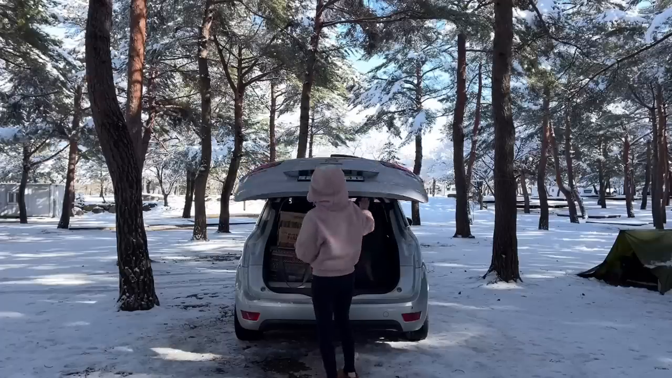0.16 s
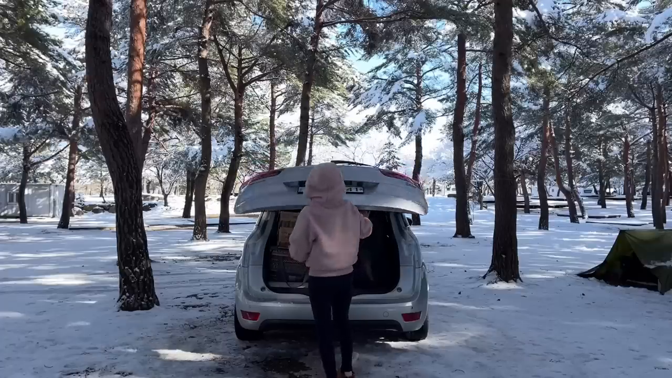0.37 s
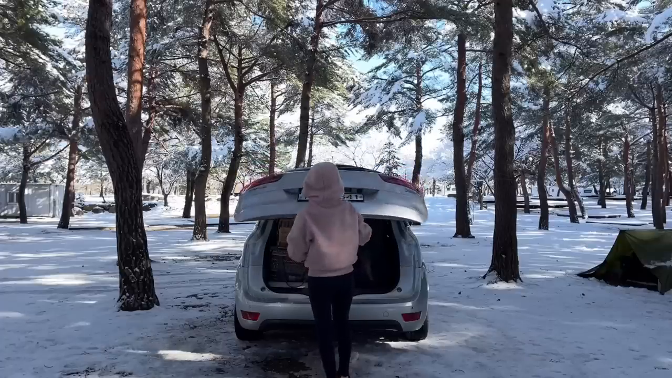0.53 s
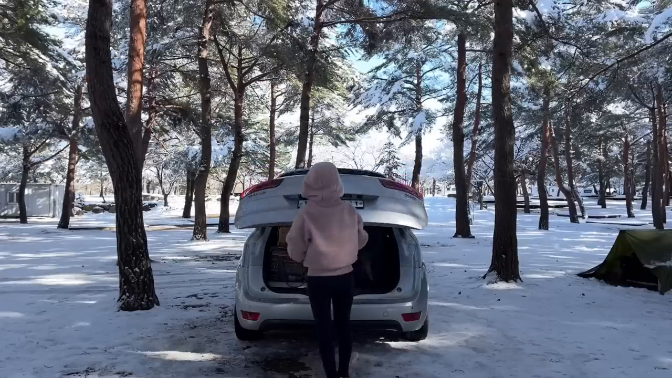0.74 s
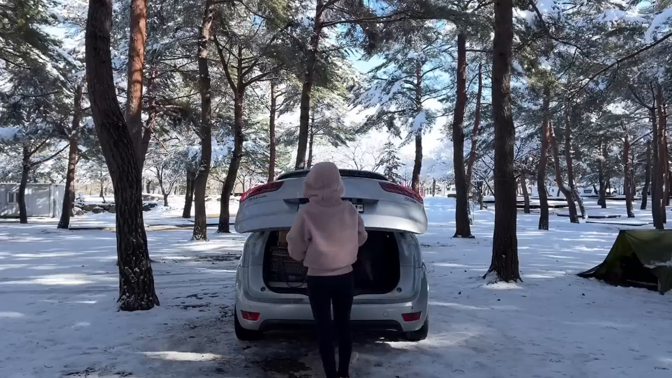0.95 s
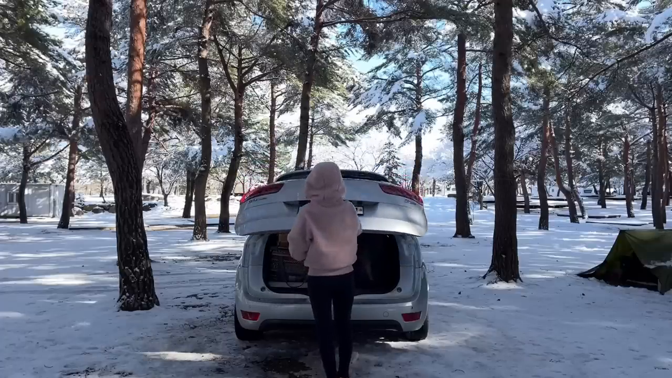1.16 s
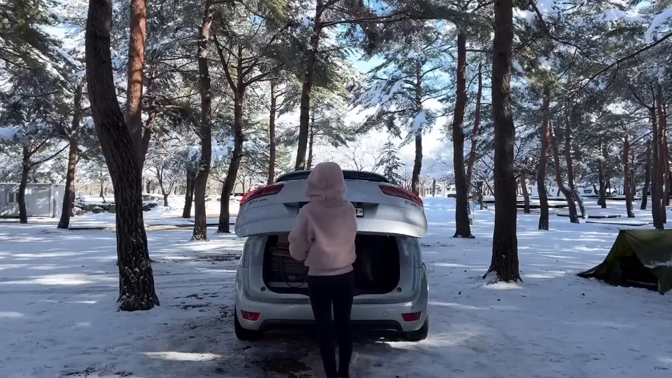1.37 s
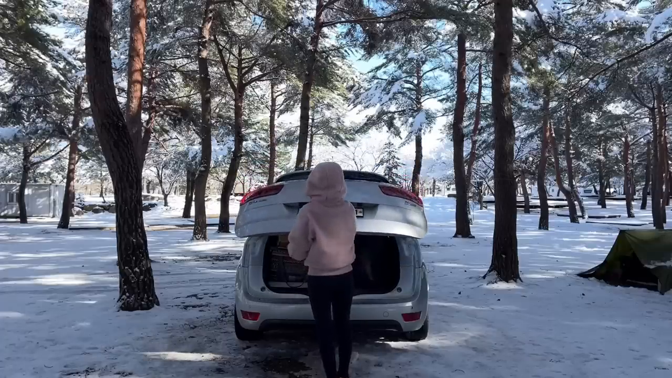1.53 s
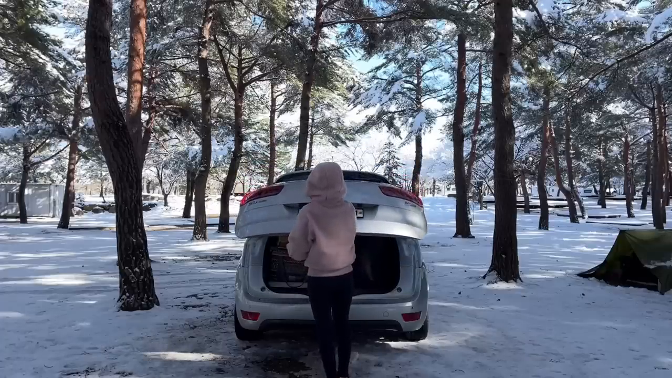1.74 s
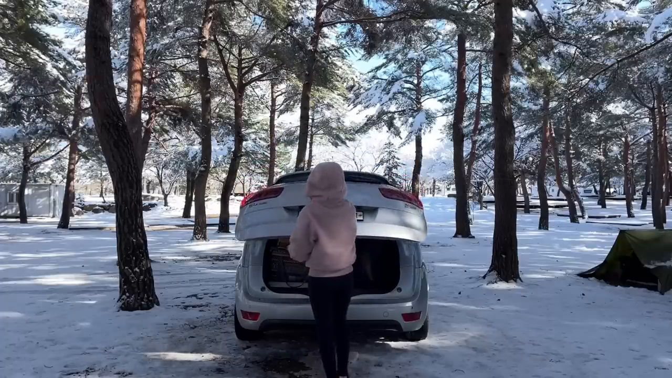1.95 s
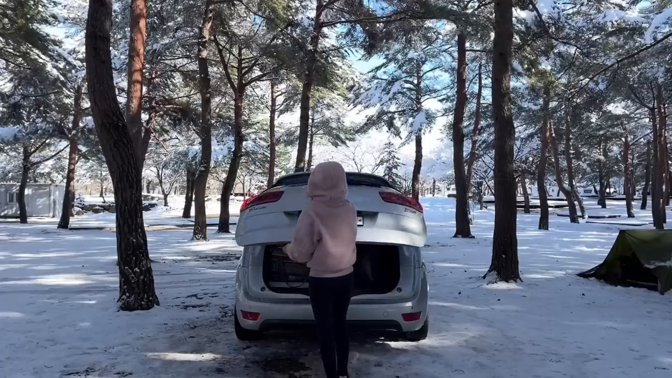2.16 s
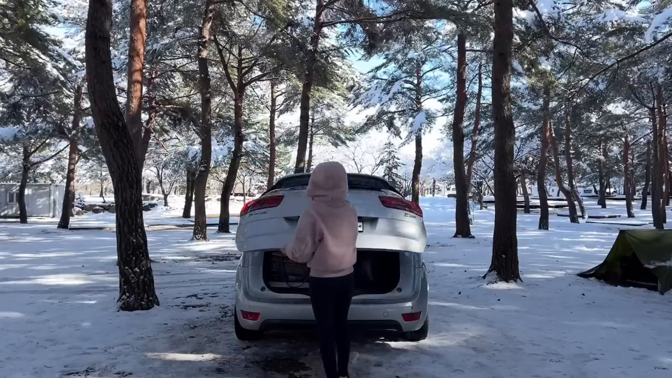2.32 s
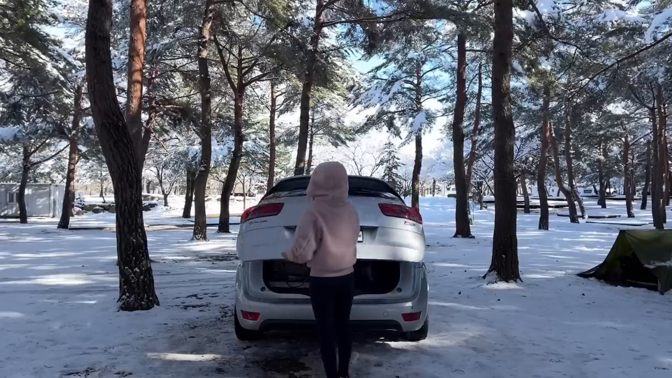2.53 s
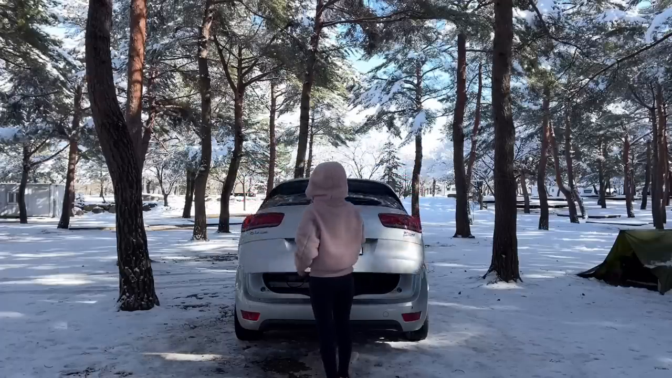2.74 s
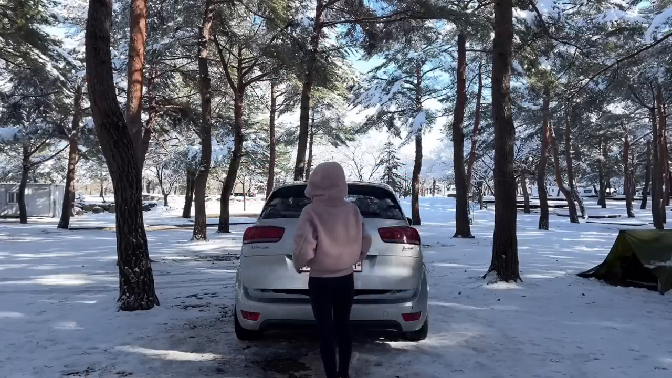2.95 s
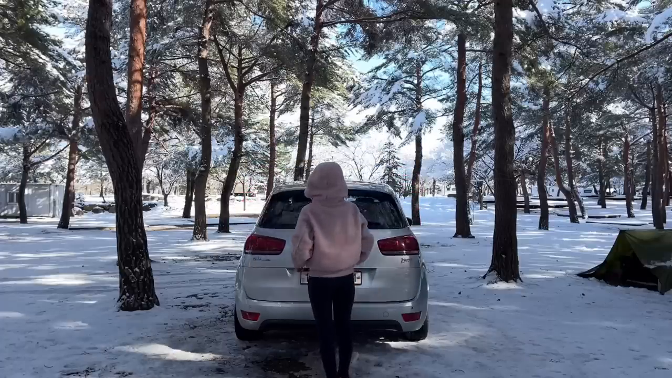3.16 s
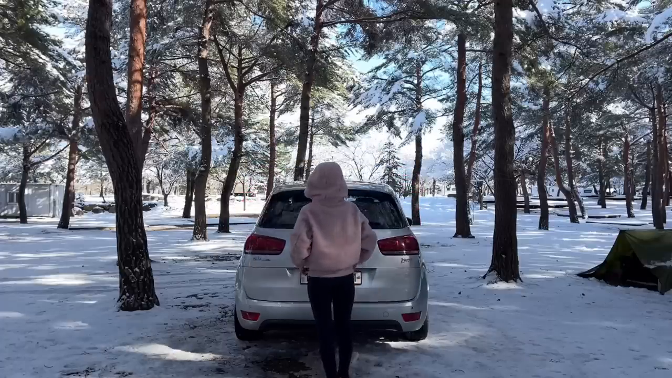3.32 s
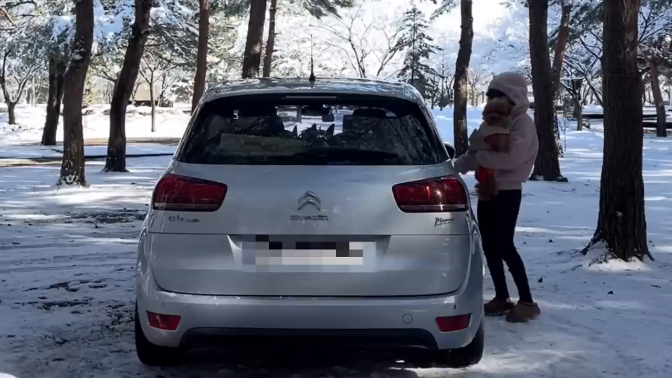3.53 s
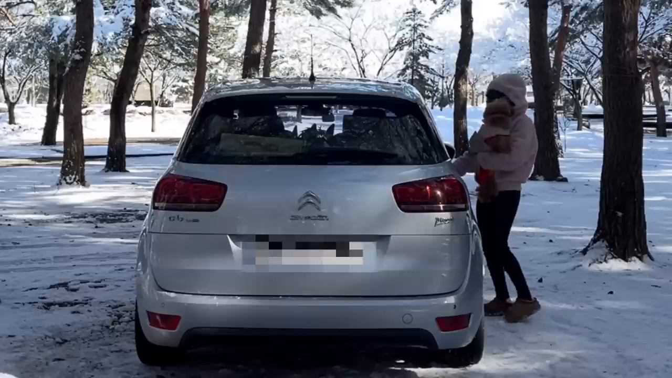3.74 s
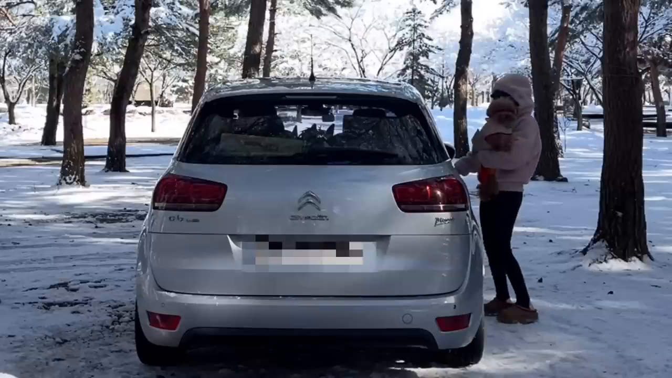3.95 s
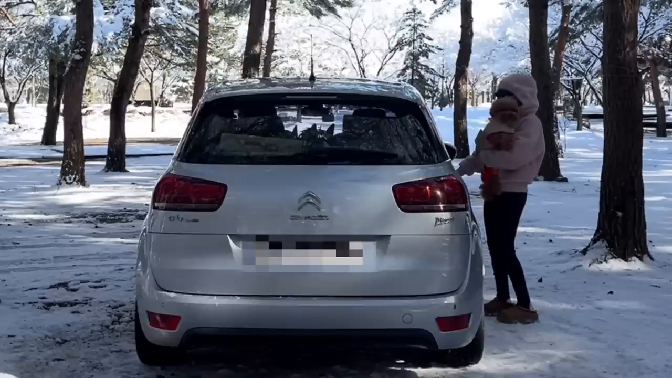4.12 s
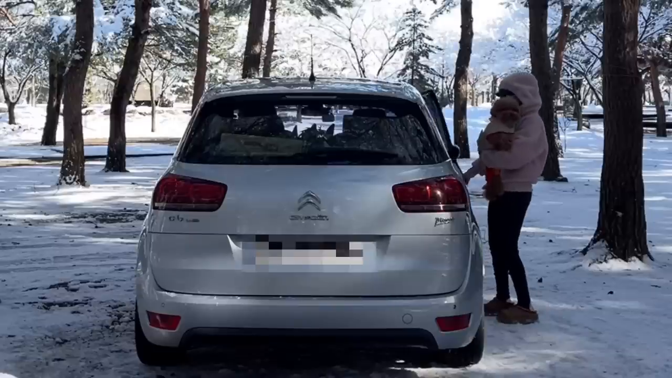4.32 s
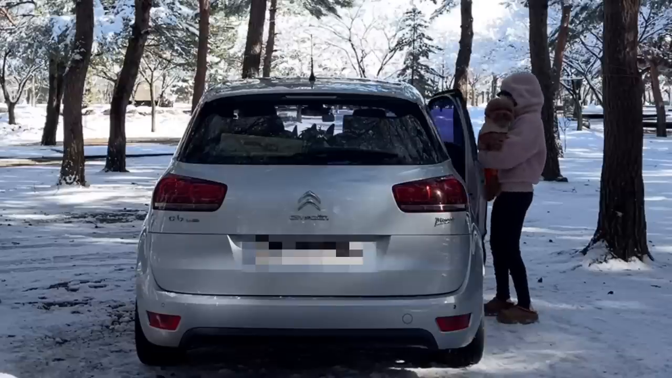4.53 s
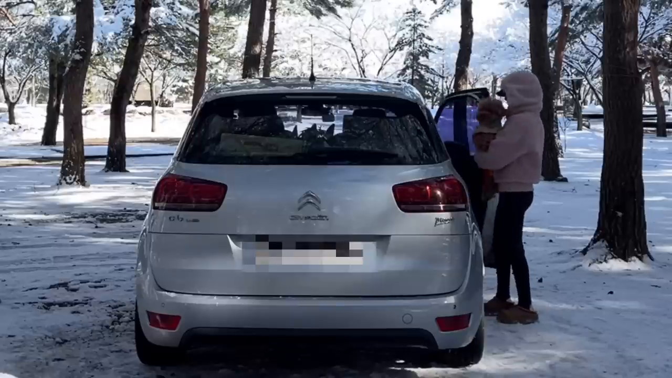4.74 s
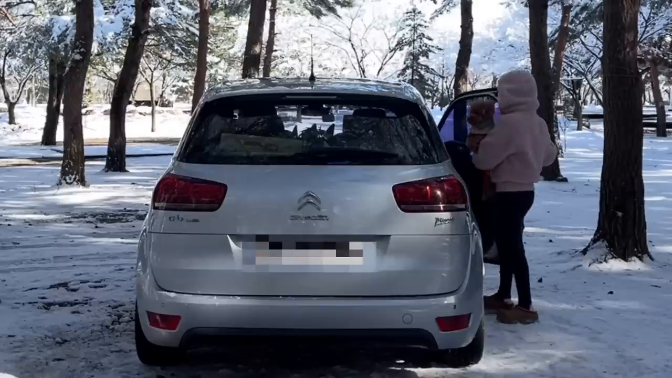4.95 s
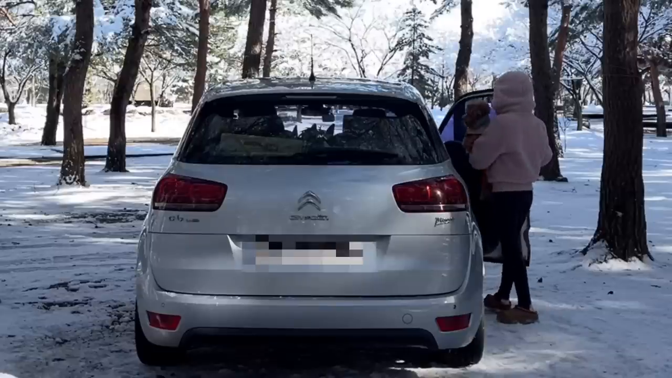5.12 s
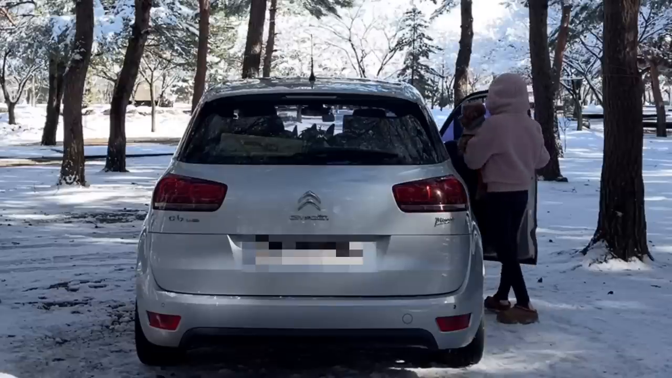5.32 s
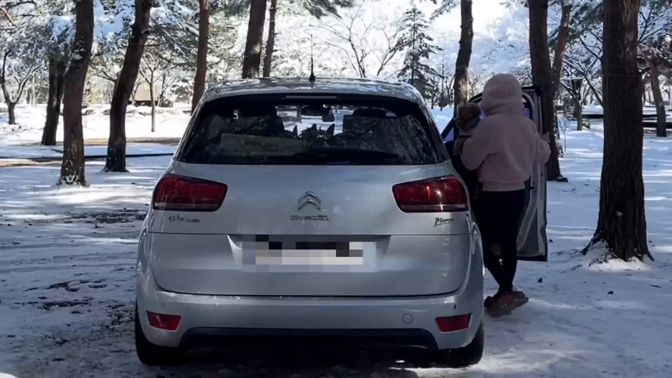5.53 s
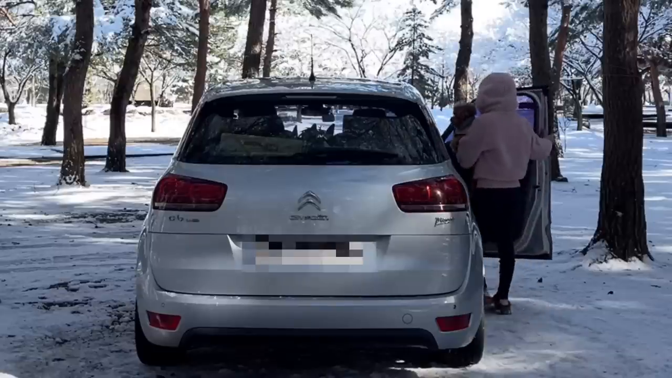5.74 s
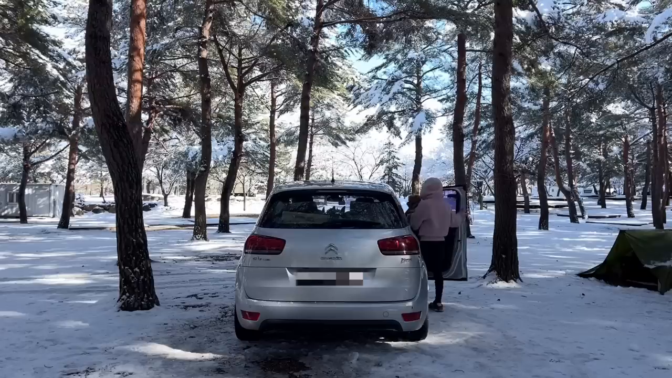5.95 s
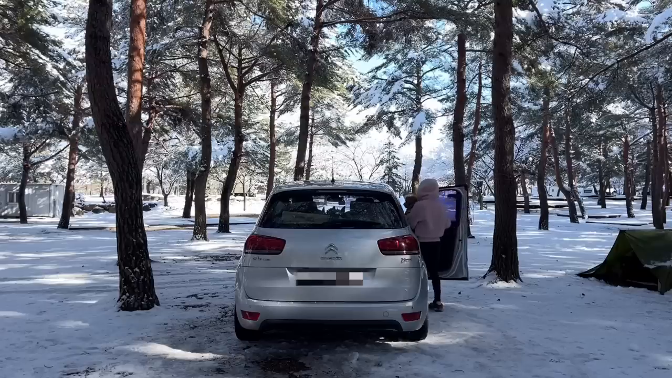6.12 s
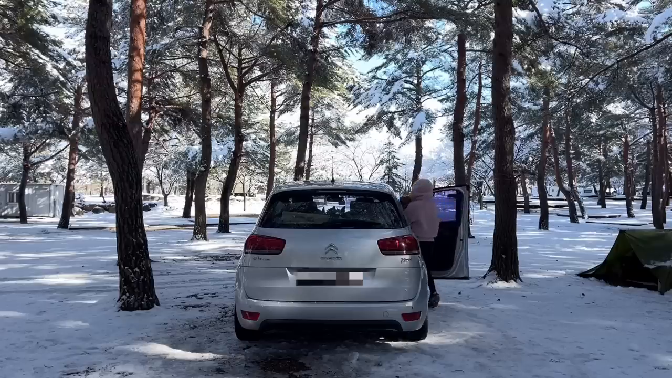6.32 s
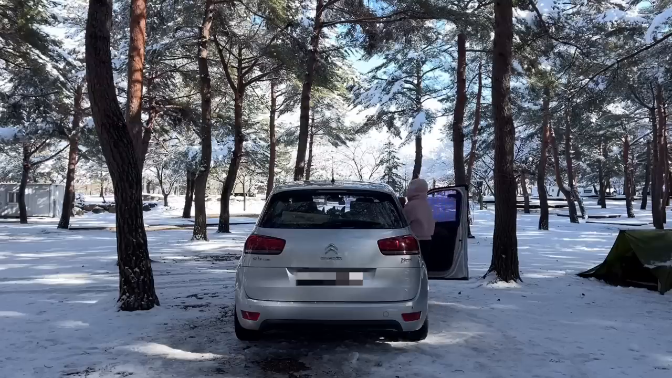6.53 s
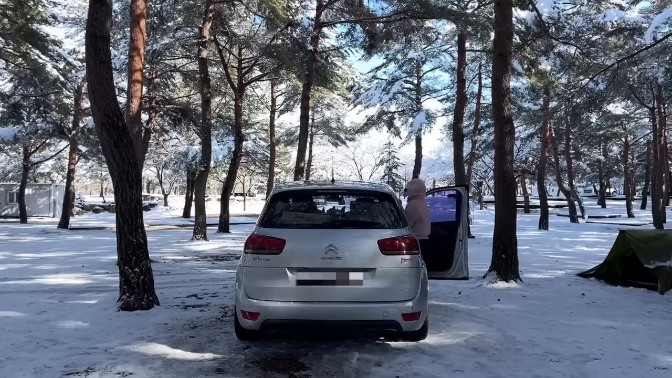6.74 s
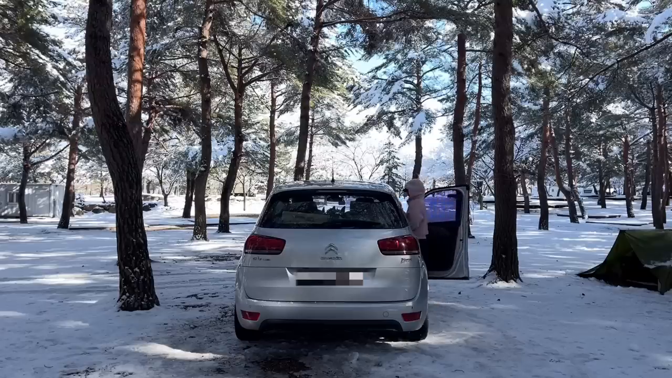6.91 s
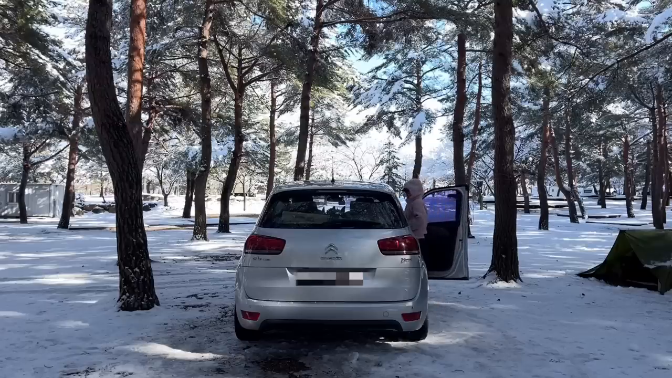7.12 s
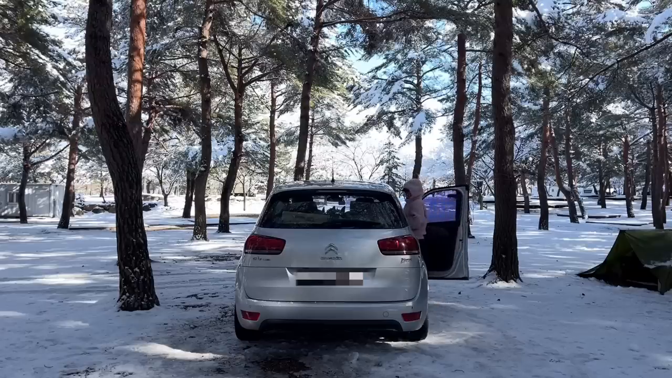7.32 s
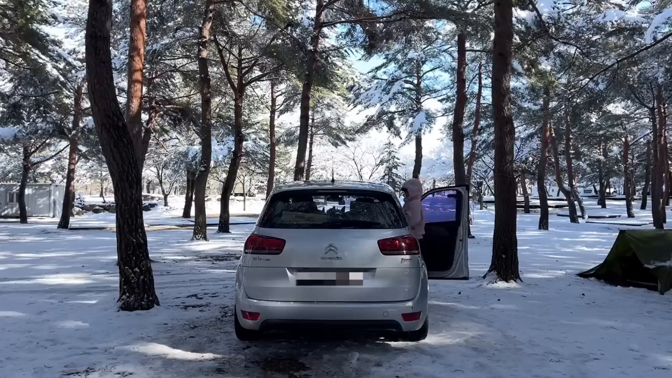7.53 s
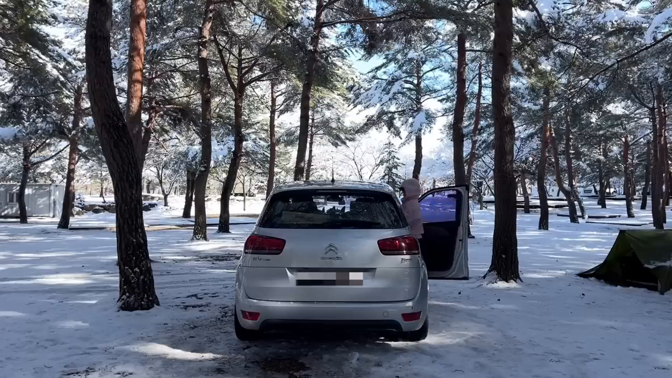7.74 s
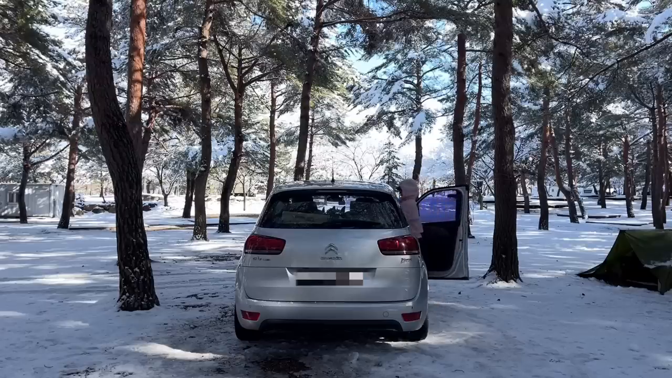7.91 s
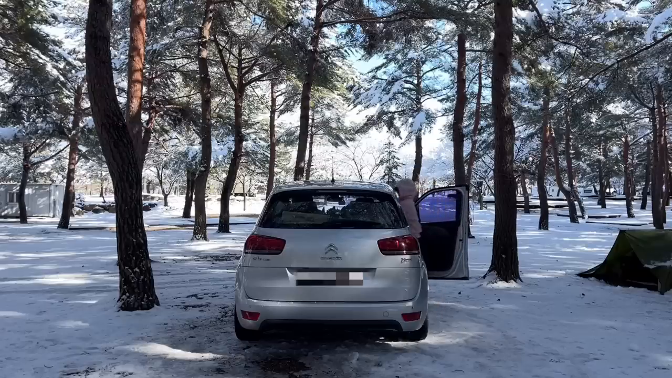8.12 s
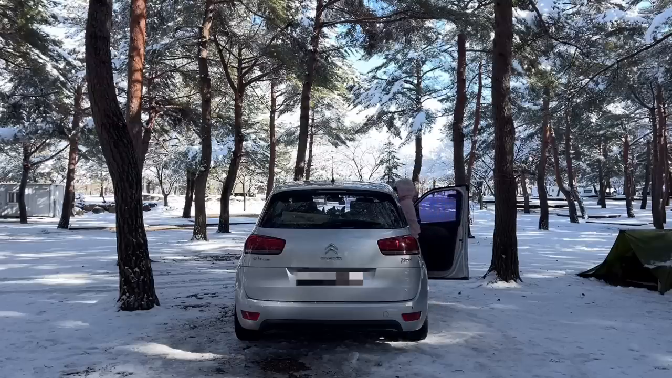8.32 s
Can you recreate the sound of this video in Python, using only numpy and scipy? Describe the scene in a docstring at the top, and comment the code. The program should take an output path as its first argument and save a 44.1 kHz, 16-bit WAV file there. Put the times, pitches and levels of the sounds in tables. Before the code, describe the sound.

Outdoor stereo microphone in an open snowy wood, facing an idling car. Crunching steps and a short scrape come first, with bright drips and very faint birds. Wind swirls rumble, then a violent tailgate slam clips the microphone, its deep cabin boom and steel latch followed by a gritty rattle and faint scattered echo from the trunks. After a sharp click, a side door pops open more softly; snow scuffs, drips, a sill knock, a latch tick and a bird call follow.

```python
"""A car idles throughout in a snowy pine wood: firing harmonics and throbbing noise, a few metres off.
Snow crunches as random cracks and meltwater drips in short noise bursts; a strut scrapes, birds call now and then.
Gusts buffet the microphone as brief swirls of low tone; then the tailgate slams, its panel modes, latch
and cabin boom overloading the microphone, and loose trim rattles. After a dry click a side door is
unlatched and swung open; a shoe knocks on its hollow sill, and latch contacts and a bird call come last."""
import sys
import numpy as np
from scipy import signal
from scipy.fft import rfft, irfft, next_fast_len
from scipy.io import wavfile

SR = 44100
rng = np.random.default_rng(int(sys.argv[2]) if len(sys.argv) > 2 else 0)


def wav_out(sig):
    """Save sig, one row per channel (or a flat mono array), as 16-bit PCM at SR to the path in sys.argv[1]."""
    wavfile.write(sys.argv[1], SR, np.round(np.clip(np.atleast_2d(sig).T, -1, 1) * 32767).astype(np.int16))


N = 369116
T = np.arange(N) / SR
FIRING_HZ = 27.33
EDDY_CYCLES = 4.17  # the same for every eddy, so the deep ones are the long ones


def amp(db):
    """Level law: decibels to amplitude ratio."""
    return 10 ** (np.asarray(db) / 20)


def unit(x):
    """Normalisation to an rms amplitude of 1."""
    return x / np.sqrt(np.mean(x ** 2) + 1e-20)


def read(points, hz):
    """Interpolation of a table on a logarithmic frequency axis."""
    f, value = np.transpose(points)
    return np.interp(np.log(hz + 1), np.log(f + 1), value)


def add(mix, s, sound):
    """Linear superposition of a sound that starts at time s."""
    part = mix[max(round(s * SR), 0):][:len(sound)]
    part += sound[:len(part)]


def bins(n):
    """Frequencies of the discrete spectrum of n samples, in Hz."""
    return np.fft.rfftfreq(n, 1 / SR)


def band(x, hz, q, order=1):
    """Resonance: the response of a damped oscillator (or several alike) to x; rms 1."""
    f = bins(len(x)) + 1e-3  # keeps clear of division by zero
    response = 1 / (1 + 1j * q * (f / hz - hz / f)) ** order
    return unit(irfft(rfft(x) * response, len(x)))


def drift(hz):
    """Slow random modulation: noise under a Gaussian low-pass of the given rate; rms 1."""
    n = next_fast_len(N)
    spectrum = rfft(rng.standard_normal(n)) * np.exp(-(bins(n) / hz) ** 2)
    return unit(irfft(spectrum, n)[:N])


def ring(modes, rise, t60):
    """Modal decay: modes swell as the blow lands, then die; t60/s holds at 1 kHz, less above."""
    t = T[:SR]
    sound = np.zeros(SR)
    for hz, db in modes:
        decay = amp(db - 60 * t / t60 * (hz / 1000) ** .2)
        sound += decay * np.sin(2 * np.pi * (hz * t + rng.random()))
    return sound * (1 - np.exp(-t / rise))


def cracks(per_s, grain_db):
    """Random impulse process: one second of tiny contacts at random times and of random size."""
    size = amp(grain_db * np.minimum(rng.exponential(1, SR), 3))
    happens = rng.random(SR) < per_s / SR
    return rng.standard_normal(SR) * happens * size


def wash(turns, level_db=-38.5, throb=0.21, swell_db=0.84):
    """Amplitude modulation: engine noise throbs with the firings and merges into the wood's hiss."""
    # engine wash and open air: f/Hz, relative level per Hz/dB
    noise_levels = [(25, -6), (45, -19), (70, 2), (110, -1.5), (170, -2.5), (260, -0.5), (420, -8.5),
                    (600, -7.5), (850, -18.5), (1250, -17.5), (1600, -24.5), (2900, -25), (4200, -31),
                    (12000, -41), (14000, -48)]
    # left-right likeness of the noise: f/Hz, correlation/1
    likeness = [(130, 0.9), (280, 0.96), (600, 0.71), (1300, 0.56), (6000, 0.59), (12000, 1)]
    # course of the treble hiss: t/s, relative level/dB
    hiss_levels = [(.5, -1.5), (2.2, -2.5), (3.5, 1.5), (5.05, -2.5), (6.4, 3.5), (7.3, -2), (8.2, -0.5)]
    f = bins(N)
    a, b = rfft(rng.standard_normal((2, N)))
    same = np.clip(read(likeness, f), -1, 1)
    mid = a * np.sqrt((1 + same) / 2)
    side = b * np.sqrt((1 - same) / 2)
    # the noise is weakened below 20 Hz
    noise = np.array([mid + side, mid - side]) * amp(read(noise_levels, f) - 60 * (f < 20))
    engine_share = 1 / (1 + (f / 2500) ** 2)
    engine = irfft(noise * engine_share, N)
    hiss = irfft(noise * (1 - engine_share), N)
    throbbing = engine * (1 + throb * np.cos(2 * np.pi * turns))
    sound = throbbing + hiss * amp(np.interp(T, *np.transpose(hiss_levels)))
    return amp(level_db + swell_db * drift(23)) * unit(sound)


def exhaust(turns, level_db=-32.5, waver=0.19, rough=0.35, smear=.21):
    """Harmonic series on the firing rate: the second order is steadiest, the others waver more."""
    # exhaust note, half multiples from unequal cylinders: multiple of firing rate/1, relative level/dB
    exhaust_orders = [(1.5, -18.5), (2, 1), (2.5, -19.5), (3, -8), (4, -13.5), (5, -11.5), (6, -13.5),
                      (7, -20), (8.5, -18), (9, -18), (9.5, -23), (10, -20.5), (11.5, -22.5), (13, -21.5)]
    # hum of the belt drive: multiple of firing rate/1, relative level/dB
    belt_orders = [(19, -25.5), (22, -24.5), (23, -26.5)]
    out = np.zeros(N)
    for order, db in list(exhaust_orders) + list(belt_orders):
        depth = waver if round(2 * order) == 4 else rough
        lag = smear * order ** 2  # the silencer spreads each firing out in time
        tone = np.cos(2 * np.pi * (order * turns - lag))
        out += amp(db) * (1 + depth * drift(5.4)) * tone
    return amp(level_db) * np.sqrt(2) * out


def eddy(db, hz, wander=0.18, peak_cycles=0.98, quicken=0.78, slowest=0.672):
    """Turbulent pressure: an eddy pushes in a few uneven cycles, quickest at their sharp peak."""
    n = int(EDDY_CYCLES / hz * SR)
    push = np.exp(-abs(T[:n] * hz - EDDY_CYCLES / 2) / peak_cycles)
    slow_noise = rfft(rng.standard_normal(SR)) * np.exp(-(bins(SR) / 200) ** 2)
    unsteady = unit(irfft(slow_noise, SR))[:n]
    rate_hz = hz * (slowest + quicken * push ** 2) * np.exp(wander * unsteady)
    turns = np.cumsum(rate_hz) / SR + rng.random()
    return amp(db) * unit(np.sin(2 * np.pi * turns) * push * np.hanning(n) ** .5)


def gusts(scatter_db=3, count=24, gap_s=.05, middle_hz=85.6, octaves=0.83):
    """Wind noise by turbulence: strong eddies, and weaker ones of random size while a breeze lasts."""
    # strongest eddies on the microphone: t of the peak/s, level/dB, nominal f/Hz
    strong_eddies = [(2.198, -22.5, 98), (2.605, -20, 77.4), (2.68, -23, 100), (2.768, -13, 57.4),
                     (2.845, -19.5, 69), (2.893, -12, 73.2), (2.897, -21.5, 180), (3.056, -18, 63),
                     (3.45, -21, 52.3), (3.502, -18.5, 62), (4.015, -22.5, 135), (4.944, -21, 66)]
    # breezy spells full of weaker eddies: start t/s, end t/s, middle level/dB
    breezes = [(2.591, 3.4, -23.5), (4.992, 5.1, -27)]
    out, eddies = np.zeros(N), list(strong_eddies)
    for start, end, db in breezes:
        for k, (late, strength, size) in enumerate(rng.uniform(-1, 1, (count, 3))):
            s = start + (k + late / 2) * gap_s
            if s < end:
                eddies.append((s, db + scatter_db * strength, middle_hz * 2 ** (octaves * size)))
    for s, db, hz in eddies:
        add(out, s - EDDY_CYCLES / hz / 2, eddy(db, hz))
    return out


def drip(tick_db, splat_db):
    """Impact noise of a drop on the snow crust: a bright tick, a duller splat and a faint spatter."""
    t = T[:2048]
    shape = np.exp(-t / 0.00098) + 0.074 * np.exp(-t / 0.034)  # impact, then spatter
    tick, splat = rng.standard_normal((2, len(t)))
    bright = amp(tick_db) * band(tick, 9430, 1.63, order=2)
    dull = amp(splat_db) * band(splat, 4700, 0.99, order=2)
    return shape * (bright + dull)


def thaw(faint_db=-46, range_db=6, far_splat_db=-5, count=80):
    """Random superposition: near drips, and many more at random times among the trees."""
    # nearest drips: t/s, tick level/dB, splat level/dB
    near_drips = [(0.1614, -32.5, -42), (1.024, -37, -42), (1.234, -37, -45), (1.4838, -32.5, -36.5),
                  (2.814, -40, -45), (3.7937, -33, -40), (4.07, -38, -27.5), (5.4535, -33, -34.5),
                  (5.8636, -37, -37), (6.096, -31.5, -35), (6.2585, -28.5, -40), (6.373, -39, -38),
                  (6.571, -39, -24.5), (6.645, -36.5, -37), (6.726, -45, -34)]
    near, far = np.zeros(N), np.zeros((2, N))
    for s, tick_db, splat_db in near_drips:
        add(near, s, drip(tick_db, splat_db))
    for when, size, side in rng.random((count, 3)):
        db = faint_db + range_db * size ** 2
        add(far[int(side * 2)], when * N / SR, drip(db, db + far_splat_db))
    return near + far + .5 * far[::-1]  # each far drip is half as strong on the other side


def birds():
    """Band-limited noise under a smooth envelope: short calls from the treetops, thin or hoarse."""
    # bird calls: t/s, level/dB, f/Hz, length/s, Q/1
    calls = [(0.612, -61, 8560, 0.25, 9), (1.616, -59, 8800, 0.17, 5.1), (8.19, -45.5, 4630, 0.14, 3.5)]
    out = np.zeros(N)
    for s, db, hz, length, q in calls:
        n = int(length * SR)
        call = band(rng.standard_normal(SR), hz, q, order=2)[:n]
        add(out, s, amp(db) * call * np.hanning(n))
    return out


def scuffs(grain_db=2.0, clump_db=3.5, q=1.04, per_s=900, spacing=1.7):
    """Stick-slip: snow and cloth slip in clumps; three resonances swell, so the colour keeps shifting."""
    # shuffling feet and clothes: t of the peak/s, level/dB, f/Hz, length/s
    shuffles = [(0.043, -44, 1770, 0.1), (.18, -47.5, 1900, .32), (3.999, -48.5, 2200, 0.18),
                (5.279, -49.5, 2400, 0.22), (5.81, -49.5, 1800, .22), (6.155, -44.5, 2120, .16),
                (6.284, -41.5, 2200, 0.12), (6.639, -38, 1700, .075), (6.704, -43.5, 1450, 0.12),
                (7.245, -49.5, 1830, 0.21), (7.765, -47.5, 1710, 0.15)]
    out, clumps = np.zeros(N), np.tanh(drift(70))  # clumps swell all three resonances together
    swells = []
    for ratio in (1 / spacing, 1, spacing):
        swell = amp(clump_db * (clumps + np.tanh(drift(76))))
        swells.append((ratio, swell / max(ratio, 1)))
    for s, db, hz, length in shuffles:
        n, slips = int(length * SR), cracks(per_s, grain_db)
        crunch = 0
        for k, (ratio, swell) in enumerate(swells):
            resonance = band(slips, hz * ratio, q, order=2)[:n]
            crunch = crunch + (-1) ** k * resonance * swell[int(s * SR):][:n]
        add(out, s - length / 2, amp(db) * unit(crunch) * np.hanning(n))
    return out


def snaps(t60=0.054, q=0.93, per_s=6000, grain_db=1.0):
    """Brittle fracture: the snow crust breaks underfoot in one short, dying run of cracks."""
    # snaps of the crust: t/s, level/dB, f/Hz
    crust_breaks = [(.006, -36.5, 1860), (.0752, -37, 1600), (0.157, -42, 2600), (0.217, -41, 2400),
                    (0.281, -34.5, 2300), (4.194, -38.5, 2200), (5.258, -41, 2820), (5.69, -33.5, 2030),
                    (6.049, -40.5, 2340), (6.286, -39, 2500), (6.615, -36.5, 1900)]
    out = np.zeros(N)
    for s, db, hz in crust_breaks:
        decay = amp(db - 60 * T[:SR] / t60)
        add(out, s, decay * band(cracks(per_s, grain_db), hz, q, order=2))
    return out


def sill():
    """Modal excitation: a shoe knocks on the hollow door sill."""
    # knocks: t/s, level/dB
    knocks = [(6.628, -28), (6.646, -31)]
    # modes of the sill: f/Hz, relative level/dB
    sill_modes = [(587, 2), (1290, -9)]
    out = np.zeros(N)
    for s, db in knocks:
        add(out, s, amp(db) * ring(sill_modes, rise=.002, t60=.09))
    return out


def click(s=3.5184, level_db=-19):
    """Impulse: one dry, full-range click, a pressure step that dies exponentially."""
    out = np.zeros(N)
    add(out, s, amp(level_db) * np.exp(-T[:SR] / 0.00056))
    return out


def strut(per_s=3500, grain_db=2, sag_per_s=1.3):
    """Stick-slip: the tailgate's strut scrapes as it is pulled down, its resonances sinking in pitch."""
    # course of the pull: t/s, level/dB
    pull = [(.465, -64), (.475, -44), (.495, -52), (.514, -38.5), (.528, -48), (.54, -45), (.56, -49.5),
            (.64, -53)]
    # resonances, which sink as the strut slows: f/Hz, width/Hz, relative level/dB
    resonances = [(950, 230, 5), (1950, 130, -1), (2700, 1300, -1), (4250, 790, -1), (5330, 1200, -9)]
    out, (when, db) = np.zeros(N), np.transpose(pull)
    t = T[:int((when[-1] - when[0]) * SR)]
    slowed = t - sag_per_s * t * (t - t[-1] / 2) / 2  # reading times, ever more slowly advanced
    slips = cracks(per_s, grain_db)
    scrape = np.zeros(len(t))
    for hz, width, level in resonances:
        resonance = band(slips, hz, hz / width)
        scrape += amp(level) * unit(np.interp(slowed, T[:SR], resonance))
    add(out, when[0], amp(np.interp(when[0] + t, when, db)) * unit(scrape))
    return out


def rattle(t60=0.12, per_s=4000, grain_db=2.5):
    """Repeated impact: loose trim shaken by the slam rebounds a few times, each a gritty buzz."""
    # rebounds: t/s, level/dB, f/Hz, Q/1
    rebounds = [(3.133, -16.5, 1300, 0.52), (3.152, -16, 1300, 0.47), (3.174, -20, 1500, 0.68),
                (3.21, -29.5, 1100, 0.6)]
    out = np.zeros(N)
    for s, db, hz, q in rebounds:
        decay = amp(db - 60 * T[:SR] / t60)
        add(out, s, decay * band(cracks(per_s, grain_db), hz, q, order=2))
    return out


def clack(db, hz, q, full_t60=0.083, halving_db=41):
    """Damped resonance: metal meets metal in one broad band, ringing longer the harder it is struck."""
    t60 = full_t60 * 2 ** (db / halving_db)  # full_t60/s at 0 dB, halved for every halving_db below
    return amp(db - 60 * T[:SR] / t60) * band(rng.standard_normal(SR), hz, q, order=2)


def clacks():
    """Impact: the metal contacts of latches and handles."""
    # contacts: t/s, level/dB, f/Hz, Q/1
    contacts = [(3.093, -19.5, 2090, 0.3), (3.1164, -7, 1650, 0.63), (3.3835, -27, 746, 0.39),
                (3.759, -33.5, 1700, 0.54), (4.515, -29, 1660, 1.1), (4.694, -36.5, 6500, 0.15),
                (4.7052, -35, 3770, 0.85), (4.7069, -23.5, 850, 2), (4.718, -23.5, 1440, 1.6),
                (7.913, -35, 2510, 1.3), (7.9173, -29.5, 1110, 2.7)]
    out = np.zeros(N)
    for s, db, hz, q in contacts:
        add(out, s, clack(db, hz, q))
    return out


def thud(rise, damping):
    """High modal density: too many panel modes to tell apart, each band dying at its own speed."""
    # crowd of overlapping modes in the body panels: f/Hz, relative level per Hz/dB
    panel_levels = [(70, 3), (140, 8.5), (250, 2.5), (370, -4.5), (650, -4.5), (950, -12), (1600, -27),
                    (2500, -35), (5000, -47), (12000, -53)]
    # their decay before the damping factor: f/Hz, t60/s
    panel_decay = [(150, 0.44), (700, 0.35), (2500, 0.57)]
    f = bins(SR)
    phases = np.exp(2j * np.pi * rng.random(len(f)))
    crowd = unit(irfft(amp(read(panel_levels, f)) * phases, SR))
    hz, t, z = signal.stft(crowd, SR, nperseg=256)
    t60 = damping * read(panel_decay, hz)[:, None]
    dying = signal.istft(z * amp(-60 * t / t60), SR, nperseg=256)[1]
    return dying[:SR] * (1 - np.exp(-T[:SR] / rise))


def panels():
    """Structure-borne sound: blows on the bodywork set its panels vibrating."""
    # blows: t/s, level/dB, rise/s, factor on the decay time/1
    blows = [(3.094, -14.5, .002, .3), (3.116, 1.5, 0.0035, 0.67), (3.149, -4.5, 0.0043, 0.64),
             (4.516, -25, 0.0018, 0.3), (4.706, -16.5, 0.0036, 0.53), (4.717, -19.5, 0.0012, 0.91)]
    out = np.zeros(N)
    for s, db, rise, damping in blows:
        add(out, s, amp(db) * thud(rise, damping))
    return out


def side_door(level_db=-9):
    """Modal decay: the clearest tones of the side door as it is unlatched."""
    # modes of the side door: f/Hz, relative level/dB
    door_modes = [(122, 1.5), (209, 2), (288, -9), (895, -14), (1175, -20)]
    out = np.zeros(N)
    add(out, 4.718, amp(level_db) * ring(door_modes, rise=0.0054, t60=.11))
    return out


def cabin():
    """Cavity resonance: air pressed in the cabin by the tailgate booms in damped low tones."""
    # booms: t/s, level/dB, f/Hz, t60/s
    booms = [(3.123, 9.5, 71.5, 0.11), (3.133, 1, 52.1, 0.43), (3.12, -4, 116, 0.23)]
    out, t = np.zeros(N), T[:SR]
    for s, db, hz, t60 in booms:
        decay = amp(db - 60 * t / t60)
        add(out, s, decay * np.sin(2 * np.pi * hz * t) * (1 - np.exp(-t / 0.0027)))
    return out


def tailgate(slam_s=3.116, level_db=-16):
    """Modal excitation: the steel latch snaps home and the slammed tailgate rings."""
    # clearest modes of the tailgate: f/Hz, relative level/dB
    tailgate_modes = [(147, 7.5), (212, -2), (263, 6), (441, -2), (515, 0), (581, 0.5), (631, 0),
                      (706, 2.5), (774, 1), (833, -1), (926, -2), (1112, -8), (1583, -3), (1674, -3)]
    # modes of its steel latch: f/Hz, relative level/dB
    latch_modes = [(927, 0), (1310, -3), (1614, -1.5), (1936, -4), (2300, -4), (2514, -4.5)]
    # the latch meets its striker, then snaps home: t/s, level/dB
    strikes = [(3.111, -13.5), (3.1162, -6)]
    out = np.zeros(N)
    for s, db in strikes:
        add(out, s, amp(db) * ring(latch_modes, rise=0.00029, t60=0.052))
    add(out, slam_s, amp(level_db) * ring(tailgate_modes, rise=0.0013, t60=.22))
    return out


def spread(x, width_db=-6):
    """Extended source: the wide body radiates from many points, so the two ports differ slightly."""
    t = T[:2048]
    paths = band(rng.standard_normal(len(t)), 3500, .5) * np.exp(-t / .005)
    paths = paths / np.linalg.norm(paths)
    side = amp(width_db) * signal.oaconvolve(x, paths)[:N] / 2
    return np.array([x + side, x - side])


def wood(x):
    """Reverberation by scattering: trunks return the sound, each band dying at its own speed."""
    # ring of the wood: f/Hz, t60/s
    wood_decay = [(100, .6), (500, .7), (2000, .8), (5000, .45), (12000, .3)]
    echoes = rng.standard_normal((2, SR)) * (rng.random((2, SR)) < 2500 / SR)
    taps = echoes * np.minimum(T[:SR] / 0.022, 1)  # echoes build up over 22 ms
    hz, t, z = signal.stft(taps, SR, nperseg=256)
    decay = amp(-60 * t / read(wood_decay, hz)[:, None])
    tail = signal.istft(z * decay, SR, nperseg=256)[1]
    return signal.fftconvolve(x[None], tail / np.linalg.norm(tail[0]), axes=1)[:, :N]


def scene(wood_db=-21):
    """Superposition of direct and scattered sound: the car straight ahead, the wood all round."""
    turns = np.cumsum(FIRING_HZ * (1 + .002 * drift(1.8))) / SR  # firing cycles so far
    events = birds() + scuffs() + snaps() + sill() + click() + strut()
    events += rattle() + clacks() + panels() + side_door() + cabin() + tailgate()
    car = exhaust(turns) + wash(turns)
    return spread(events) + amp(wood_db) * wood(events) + car + thaw() + gusts()


def record(dry, low_cut_hz=31, edge_hz=16200):
    """Transduction: two coloured microphone ports, a low cut, hard overload, then the band limit."""
    # phase between the two ports: f/Hz, phase/rad
    port_phase = [(1500, 0), (4000, .5), (7500, .7), (8800, -.3), (10200, -3.14), (11200, -5.4),
                  (12700, -6.5)]
    # microphone colour: f/Hz, level/dB
    colour = [(7000, -1.5), (8800, 3), (10200, 9.5), (11200, 9), (12300, -10), (13300, -16), (16000, -27)]
    f = bins(N)
    port = amp(.4) * np.exp(.5j * read(port_phase, f))  # each port takes half the phase
    heard = irfft(rfft(dry) * amp(read(colour, f)) * np.array([port, 1 / port]), N)
    low_cut = signal.butter(2, low_cut_hz, "high", fs=SR, output="sos")
    heard = signal.sosfilt(low_cut, heard)
    edge = signal.firwin(255, edge_hz, window=("kaiser", 9), fs=SR)
    return signal.oaconvolve(np.clip(heard, -1, 1), edge[None], "same")


dry = scene()
out = record(dry)
wav_out(out)
```